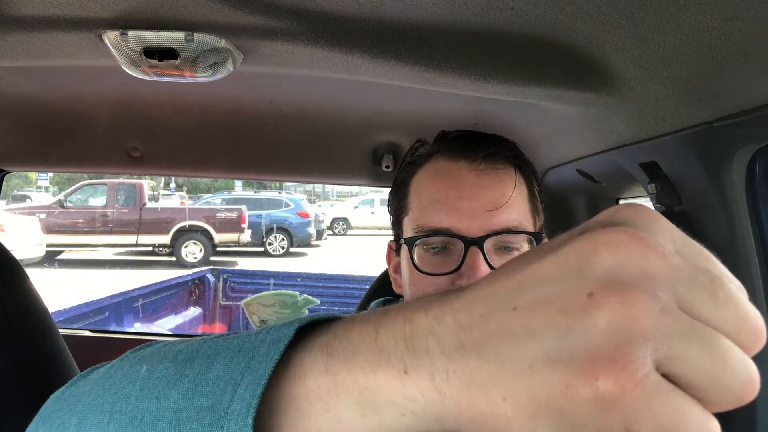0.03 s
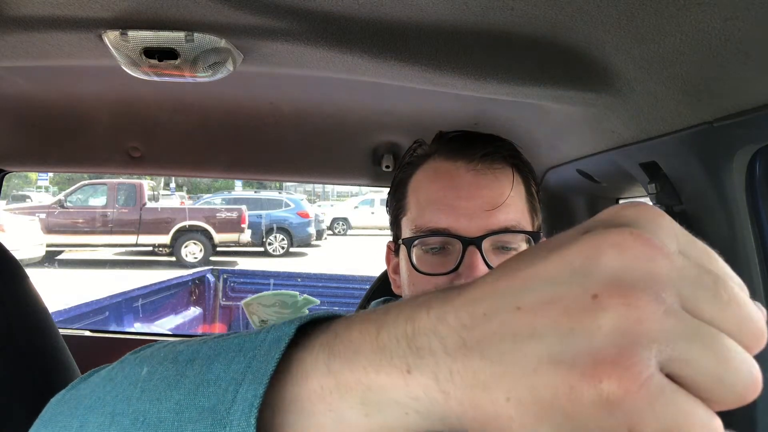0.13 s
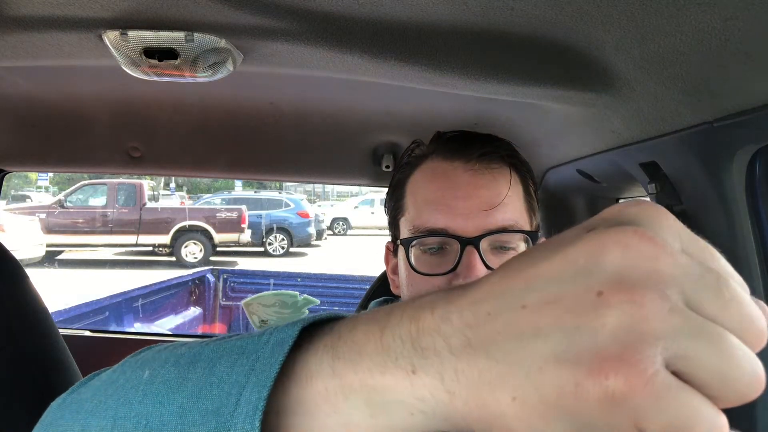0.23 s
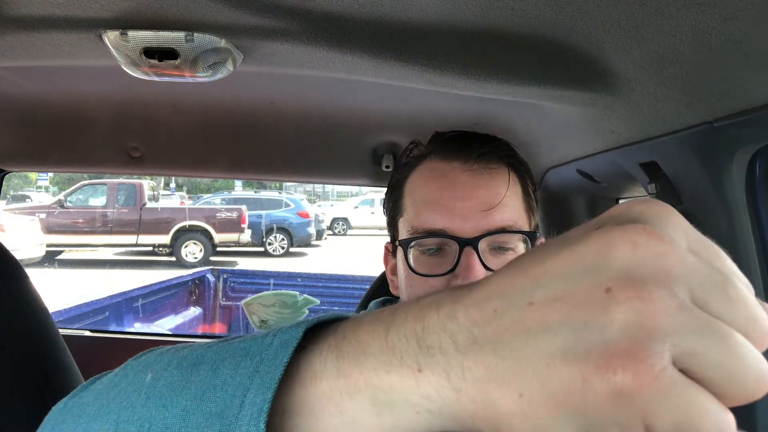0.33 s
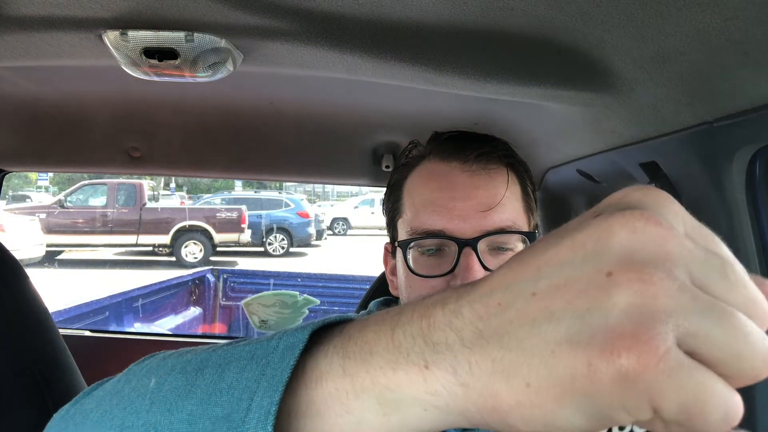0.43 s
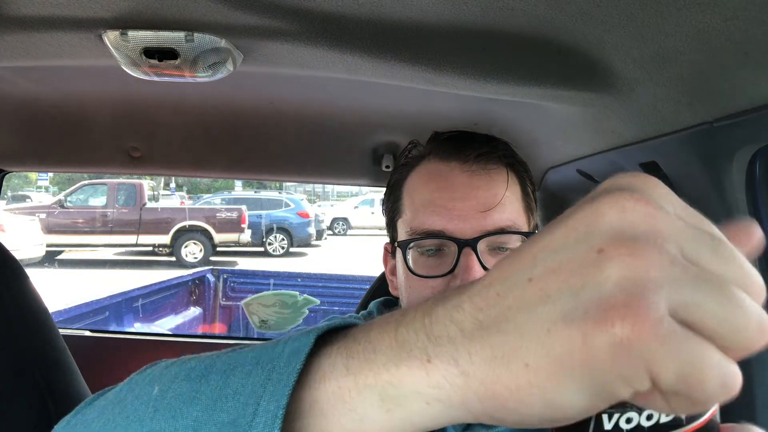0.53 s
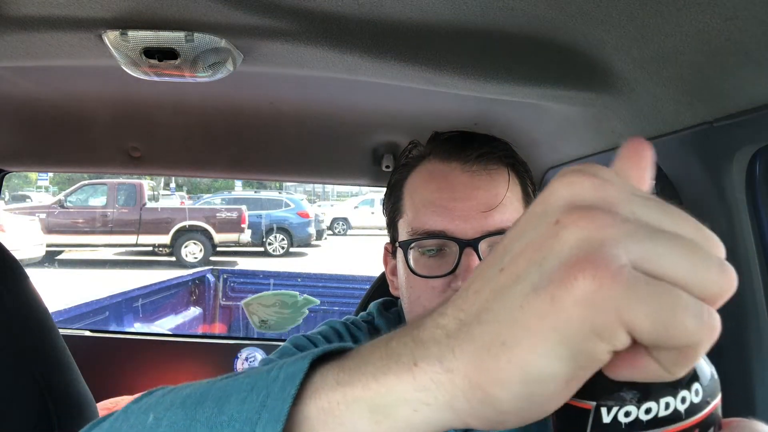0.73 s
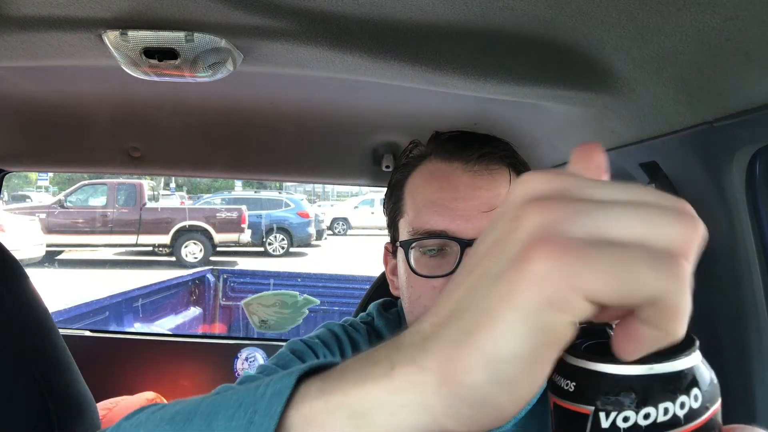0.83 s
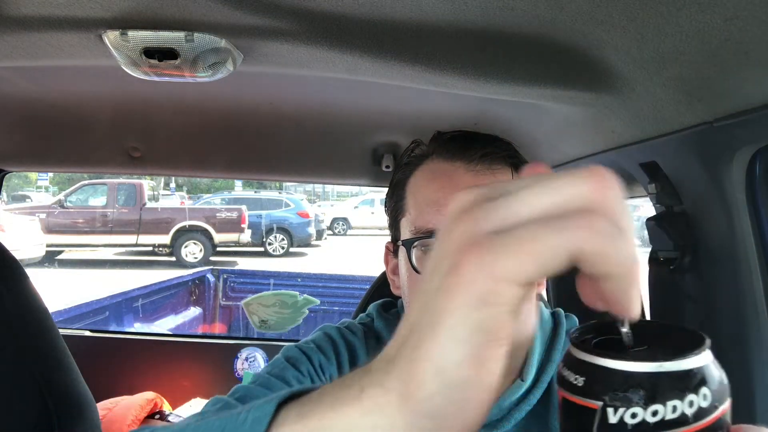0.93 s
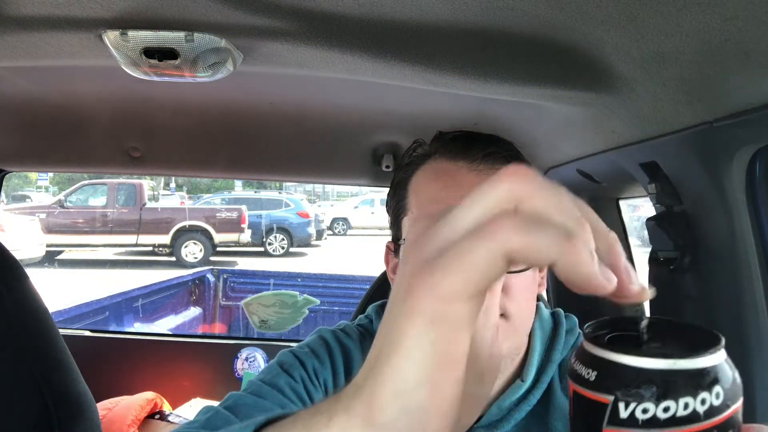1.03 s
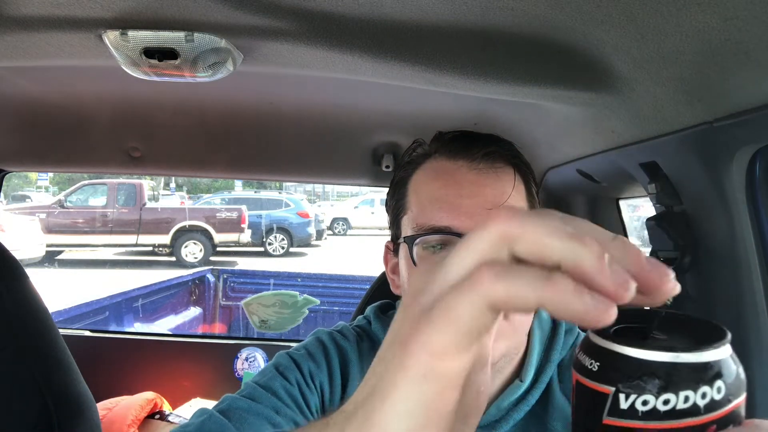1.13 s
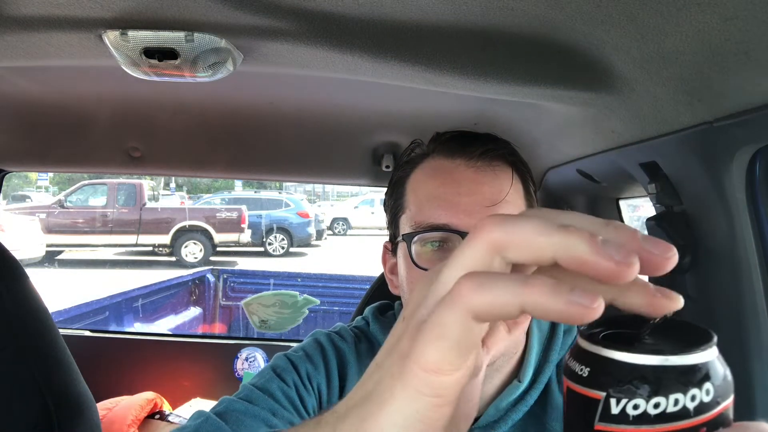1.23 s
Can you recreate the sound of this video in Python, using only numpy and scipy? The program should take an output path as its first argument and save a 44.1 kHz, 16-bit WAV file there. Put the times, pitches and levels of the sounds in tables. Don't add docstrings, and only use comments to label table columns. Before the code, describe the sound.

An aluminium drink can opens close to the microphone in a parked car with low, distant traffic rumble. A faint tab touch starts it; the lid creaks and the seal snaps sharply at 0.25 s. Around 0.36 s the lid tears with a loud crack, short hiss and hollow pop, folding until 0.45. Soft fumbling follows, a clear tap at 0.66, a faint squeak near 0.95, and hollow metallic clinks around 1.06.

```python
import sys
import numpy as np
from scipy import signal
from scipy.fft import rfft, irfft, next_fast_len
from scipy.io import wavfile
from scipy.ndimage import map_coordinates

SR = 44100
rng = np.random.default_rng(int(sys.argv[2]) if len(sys.argv) > 2 else 0)


def invert_db(x):
    u = np.asarray(x, float) / 20
    return 10 ** u


def bounce(signal):
    frames = np.transpose(np.atleast_2d(signal))
    limited = np.clip(frames, -1, 1)
    pcm = np.round(limited * 32767).astype(np.int16)
    wavfile.write(sys.argv[1], SR, pcm)


N = 57330

FAVOUR_DB = 5.5
RISE_S = .0002
GAS_FLUTTER_DB = 3


def unit(x):
    return x / np.sqrt(np.mean(x ** 2) + 1e-20)


def along(points, hz):
    f, v = np.transpose(points)
    return np.interp(np.log(hz + 1), np.log(f + 1), v)


def curve(rows):
    s, db = np.transpose(rows)
    return np.interp(np.arange(N) / SR, s, db, left=-150, right=-150)


def wobble(rate):
    knots = rng.standard_normal(int(N * rate / SR) + 4)
    return map_coordinates(knots, [np.arange(N) * rate / SR])


def filtered(x, response):
    m = next_fast_len(2 * len(x))
    spectrum = rfft(x, m) * response(np.fft.rfftfreq(m, 1 / SR))
    return irfft(spectrum, m)[:len(x)]


def noise(spectrum, size):
    lowest_hz = spectrum[0][0] / 2
    colour = lambda hz: (hz > lowest_hz) * invert_db(along(spectrum, hz))
    return unit(filtered(rng.standard_normal(size), colour))


def fade(t, t60, rise):
    return invert_db(-60 * t / t60) * (1 - np.exp(-t / max(rise, 1e-5)))


def ring(modes, t, t60, favour_hz=0):
    scatter_db, detune, phase_scatter = 1.5, .005, .4
    hz, db = np.transpose(modes)[..., None]
    if favour_hz:
        db = db - FAVOUR_DB * np.log2(hz / favour_hz) ** 2
    a, b, c = rng.standard_normal((3, len(modes), 1))
    phase = 2 * np.pi * hz * (1 + detune * b) * t + phase_scatter * c
    waves = invert_db(db + scatter_db * a) * np.sin(phase)
    return invert_db(-60 * t / t60) * waves.sum(0) / np.linalg.norm(invert_db(db))


def resonances(table):
    def peak(k, f):
        centre, width, db = table[k]
        damping = 1j * f * width
        return (-1) ** k * invert_db(db) * damping / (centre ** 2 - f ** 2 + damping)
    return lambda f: sum(peak(k, f) for k in range(len(table)))


def stick_slip():
    rate, size_db = 9000, 9.5
    when, size, sign = rng.random((3, N))
    return (when < rate / SR) * invert_db(-size_db * np.log(size + .02)) * (sign - .5)


def driven(force, table):
    slips, response = stick_slip(), resonances(table)
    steady = filtered(slips, response)
    return filtered(slips * force, response) / np.sqrt(np.mean(steady ** 2))


def add(track, s, sound):
    part = track[max(round(s * SR), 0):][:len(sound)]
    part += sound[:len(part)]


def cabin(x):
    # frequency in Hz, t60 in seconds.
    decay = [(300, .06), (2000, .07), (6000, .068), (10000, .062), (15000, .055)]
    tail_db, delay_s = -8.5, .0015
    hz, t, z = signal.stft(rng.standard_normal(SR // 8), SR, nperseg=128)
    tail = signal.istft(z * invert_db(-60 * t / along(decay, hz)[:, None]), SR, nperseg=128)[1]
    tail = np.pad(tail / np.linalg.norm(tail), (round(delay_s * SR), 0))
    return x + invert_db(tail_db) * signal.fftconvolve(x, tail)[:len(x)]


def traffic():
    # frequency in Hz, density in dB per Hz.
    rumble = [(12, -49.5), (20, -11.5), (48, 0), (150, -5), (210, -8.5), (319, -11), (976, -27),
              (1220, -28.5), (16000, -44.5)]
    # frequency in Hz, level in dB.
    hum = [(105, -73), (152, -65.5), (305, -69.5)]
    rumble_db, swell_db = -58, .3
    t = np.arange(N) / SR
    out = invert_db(rumble_db + swell_db * wobble(24)) * noise(rumble, N)
    for hz, db in hum:
        out += invert_db(db + 1.8 * wobble(5.6)) * np.sin(2 * np.pi * hz * t + 0.5 * wobble(17))
    return out


def rub():
    # time in seconds, level in dB.
    sliding = [(.5, -80), (.55, -67), (.6, -71), (.632, -66), (.66, -69), (.76, -80), (.86, -74),
               (.95, -72), (1.03, -86)]
    # frequency in Hz, density in dB per Hz.
    skin = [(700, 0.5), (1250, 13), (1600, -3.5), (2200, 3), (2800, -12.5), (3500, 1.5), (4500, -6),
            (9000, -13.5)]
    # centre in Hz, width in Hz, level in dB.
    hz, width, db = (4950, 170, -80)
    start, end = (.915, .98)
    size = round((end - start) * SR)
    narrow = lambda f: 1 / (1 + ((f - hz) / width) ** 4)
    whistle = unit(filtered(rng.standard_normal(size), narrow))
    out = invert_db(curve(sliding) + 4.4 * wobble(72)) * noise(skin, N)
    add(out, start, invert_db(db) * np.hanning(size) ** .5 * whistle)
    return out


def finger_taps():
    # start in seconds, level in dB, favoured pitch in Hz, t60 in seconds.
    taps = [
        (.001, -48.5, 5500, 0.0077),
        (.010, -63.5, 6600, 0.053),
        (.052, -67, 8050, 0.015),
        (.6585, -40.5, 3430, 0.044),
        (.6635, -80, 2930, 0.028),
        (.668, -53, 3537, 0.027),
        (.677, -58.5, 3500, 0.046),
        (.857, -61.5, 9860, 0.018),
        (1.0, -66.5, 8050, 0.023),
    ]
    fumbles = [
        (.509, -86, 2200, 0.028),
        (.519, -64, 3195, 0.037),
        (.533, -62.5, 2200, .025),
        (.545, -57, 4030, 0.07),
        (.554, -65, 2480, 0.024),
        (.574, -68.5, 2300, 0.031),
        (.625, -69.5, 2377, 0.054),
        (.636, -60.5, 2970, .04),
        (.646, -63.5, 2200, 0.048),
    ]
    first_tap = [
        (1.0487, -53, 3120, 0.034),
    ]
    late_taps = [
        (1.0637, -48, 3000, 0.055),
        (1.0695, -45, 3000, 0.031),
        (1.076, -53, 2560, 0.02),
        (1.082, -64.5, 3160, 0.025),
    ]
    # frequency in Hz, level in dB.
    loose_tab = [(1820, 15), (2200, 13.5), (2500, -10.5), (3150, 10.5), (3400, 13), (3890, 12), (4300, -6),
                 (4500, -12), (5950, 9.5), (6900, 10), (8597, 10), (9680, 14), (11500, -7)]
    damped_tab = [(1770, -3), (2100, 14.5), (2350, 14), (3250, 8), (3900, 0), (4400, 7), (4800, -8),
                  (5200, -11), (6900, 12.5), (9000, 2)]
    held_tab = [(1550, -1), (2730, -19), (3250, -15), (3420, 0), (4470, -8), (5370, -8), (6000, 8.5),
                (8000, -11)]
    bent_tab = [(1360, 8.5), (1800, -0.5), (2250, -11), (2860, -15), (3390, 4), (3850, -15), (4250, 2.5),
                (4460, -6), (5040, 0), (5320, -2), (5930, -0.5), (7600, -1), (10300, 9.5)]
    scuff_db, scuff_life, longest_s = -3, 0.52, .045
    out, t = np.zeros(N), np.arange(SR // 7) / SR
    for table, modes in ((taps, loose_tab), (fumbles, damped_tab), (first_tap, held_tab), (late_taps, bent_tab)):
        for s, db, favour_hz, t60 in table:
            low_db = -FAVOUR_DB * np.log2(1000 / favour_hz) ** 2
            high_db = -4 - 2 * FAVOUR_DB * np.log2(16000 / favour_hz)
            colour = [(1000, low_db), (favour_hz, 0), (16000, high_db)]
            scuff = invert_db(scuff_db) * fade(t, scuff_life * t60, RISE_S) * noise(colour, len(t))
            metal = ring(modes, t, min(t60, longest_s), favour_hz)
            add(out, s, cabin(invert_db(db) * (metal + scuff)))
    return out


def air_pops():
    # start in seconds, level in dB, pitch in Hz, t60 in seconds, rise in seconds.
    strikes = [(.3650, -25, 670, .03, .004), (.3715, -23, 610, .035, .002), (.3720, -34, 500, .04, .002),
               (.3720, -26, 900, .012, .001), (.2485, -38, 510, .028, .0004), (.2465, -33, 985, .02, .001),
               (.2465, -33, 1420, .012, .001), (.519, -54, 780, .07, .003), (.543, -56, 790, .05, .003),
               (.637, -57, 904, .07, .003), (.6585, -41.5, 922, .085, .002), (.822, -55, 1215, .12, .015),
               (1.0487, -47, 1150, .045, .001), (1.0637, -41, 1145, .035, .001),
               (1.0689, -35, 1145, .055, .002), (.004, -61, 1345, .09, .004),
               (1.0495, -54, 2740, .045, .002)]
    wet = .4
    out, t = np.zeros(N), np.arange(SR // 5) / SR
    for s, db, hz, t60, rise in strikes:
        tone = invert_db(db) * fade(t, t60, rise) * np.sin(2 * np.pi * hz * t)
        add(out, s, tone + wet * (cabin(tone) - tone))
    return out


def breath():
    # frequency in Hz, density in dB per Hz.
    hiss = [(900, -17.5), (1500, -14), (3000, -8), (8000, -2), (15500, -9)]
    mouth = [(380, -28), (600, 1), (750, 2), (1000, -7), (1400, -6.5), (1700, -24)]
    # time in seconds, level in dB.
    gulp = [(.355, -64), (.364, -44), (.371, -35), (.380, -43), (.390, -42), (.404, -57), (.425, -71.5),
            (.434, -54), (.452, -68)]
    hiss_db = -8
    gas = tear_force() * invert_db(hiss_db + GAS_FLUTTER_DB * wobble(280)) * noise(hiss, N)
    return gas + invert_db(curve(gulp) + GAS_FLUTTER_DB * wobble(150)) * noise(mouth, N)


def folding_lid():
    # time in seconds, level in dB.
    flex = [(.380, -60), (.396, -47), (.402, -41), (.408, -46), (.414, -44), (.424, -49), (.430, -45),
            (.447, -52), (.457, -75)]
    # frequency in Hz, width in Hz, level in dB.
    lid = [(1770, 90, -3), (2080, 130, -1), (2320, 180, 0), (2560, 180, 0), (3150, 250, -14),
           (4810, 200, -12)]
    # time in seconds, level in dB.
    creases = [
        (0.3994, -7),
        (0.4125, -5),
        (0.4264, -2),
    ]
    clicks = np.zeros(N)
    for s, db in creases:
        clicks[round(s * SR)] = invert_db(db)
    return driven(invert_db(curve(flex)), lid) + filtered(clicks, resonances(lid))


def tear_force():
    # time in seconds, level in dB.
    pull = [(.358, -44), (.365, -29), (.3700, -20), (.3745, -25), (.379, -33), (.388, -24.5), (.397, -38),
            (.424, -50), (.434, -43), (.452, -70)]
    return invert_db(curve(pull) + 2.5)


def tear():
    # frequency in Hz, width in Hz, level in dB.
    flap = [(2200, 220, -5.5), (3190, 280, -3.5), (3910, 190, 2.5), (4500, 1194, -5), (6200, 2400, -6.5),
            (8780, 290, -0.5), (10255, 2700, -21.5), (13800, 1200, -13.5)]
    return cabin(driven(tear_force(), flap) + folding_lid() + breath())


def snaps():
    # start in seconds, level in dB, lid drum in dB over it, crack in dB over it,
    # favoured pitch in Hz.
    slips = [(.2232, -47.5, -7, -1, 6720), (.2270, -51.5, 3.5, -5.5, 5050), (.2312, -48, 1, -9.5, 5500),
             (.2362, -39, -6, -12, 4500), (.2422, -20, 3, 0, 6050), (.2608, -37.5, -10.5, -2, 7000),
             (.2790, -48, -7, -7, 5900), (.3272, -33.5, -8.5, -10, 5870), (.3312, -43, -4, -4, 6220),
             (.3450, -20, -7.5, -14, 5330), (.3506, -29, -3, -12, 5000), (.3582, -13, -8, -12, 6000),
             (.3645, -12, -10, -12, 6000), (.3608, -12, -9, -2.5, 4500), (.3684, -8, -15.5, -4, 5910),
             (.3815, -33.5, -4.5, -7, 4000), (.3902, -29.5, -13.5, 4, 3920), (.3998, -34, -15.5, 3.5, 8060),
             (.4050, -40.5, 5, 1, 5070), (.4128, -34.5, -5, -7.5, 7400), (.4285, -40.5, 1.5, 6.5, 6015),
             (.4322, -24.5, -24, 1, 6800), (.4342, -32.5, -5, -0.5, 4630)]
    seal = [
        (.2464, -7, -2.8, 0.5, 5600),
    ]
    flap_break = [
        (.3709, -3, -10, 2, 3300),
    ]
    # frequency in Hz, level in dB.
    drum = [(1762, -8.5), (1990, 4.5), (2190, -3.5), (2330, -10.5), (2750, -1.5)]
    tab = [(3150, -6), (3960, -9.5), (4480, -2.5), (4820, -13), (5190, -3), (5620, 1.5), (6062, 3.5),
           (6500, -2), (7500, -9), (8600, -10), (10400, -7.5), (11700, -13), (13200, -7)]
    # frequency in Hz, density in dB per Hz.
    crack_colour = [(300, -26), (700, -31.5), (1300, -6.5), (1900, -14.5), (3000, -9.5), (5600, -4.5),
                    (8300, -14.5), (13400, -8.5), (16000, -21)]
    tab_t60, drum_t60, crack_t60 = .024, .026, .017
    lid_cut_hz = 1640
    out, t = np.zeros(N), np.arange(SR // 7) / SR
    for table, life in ((slips, .42), (seal, .95), (flap_break, .12)):
        for s, db, drum_db, crack_db, favour_hz in table:
            crack = invert_db(crack_db - 60 * t / (crack_t60 * life)) * noise(crack_colour, len(t))
            metal = ring(tab, t, tab_t60 * life, favour_hz)
            metal += invert_db(drum_db) * ring(drum, t, drum_t60 * np.sqrt(life))
            onset = 1 - np.exp(-t / RISE_S)
            add(out, s, cabin(invert_db(db) * onset * (metal + crack)))
    return signal.sosfilt(signal.cheby1(6, 1, lid_cut_hz, 'highpass', fs=SR, output='sos'), out)


def scene():
    return (traffic() + rub() + finger_taps() + air_pops() + tear() + snaps())[None]


def low_pass(x):
    return signal.sosfilt(signal.butter(12, 16800, fs=SR, output="sos"), x)


def record(dry):
    top_hz, low_cut_hz = 15900, 36
    band = lambda hz: 1 / (1 + (hz / top_hz) ** 80) / (1 + (low_cut_hz / (hz + 1)) ** 4)
    mix = filtered(dry[0], band)[None]
    return low_pass(mix)


dry = scene()
out = record(dry)
bounce(out)
```